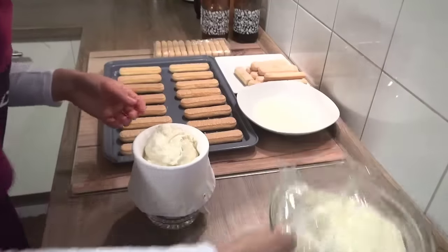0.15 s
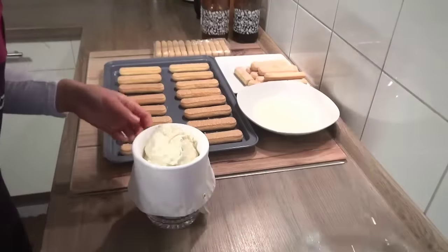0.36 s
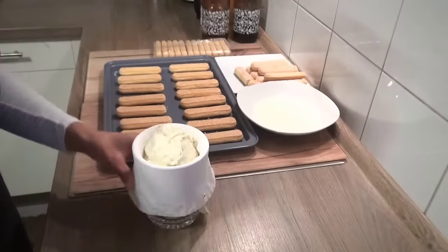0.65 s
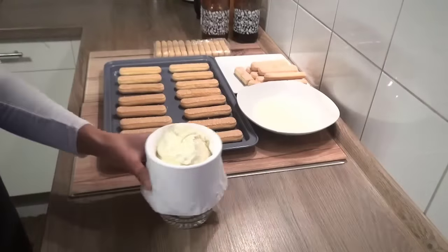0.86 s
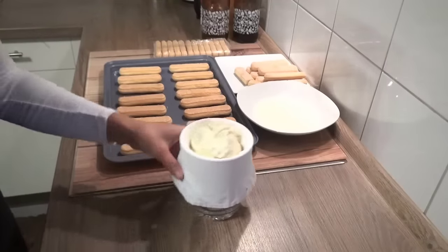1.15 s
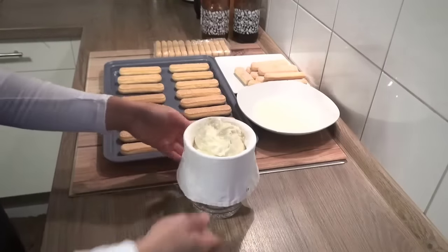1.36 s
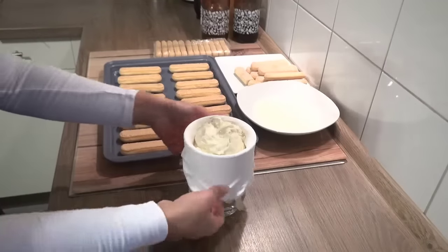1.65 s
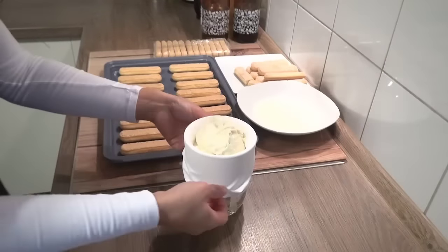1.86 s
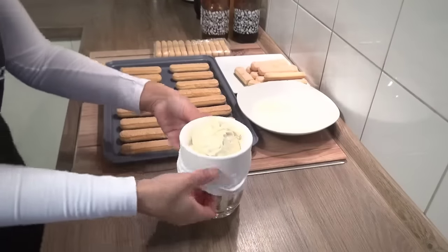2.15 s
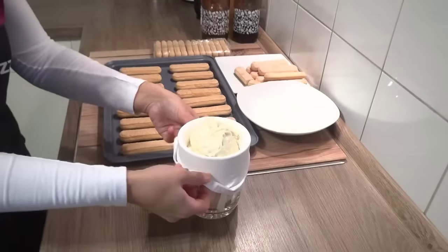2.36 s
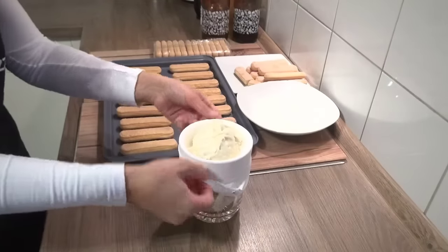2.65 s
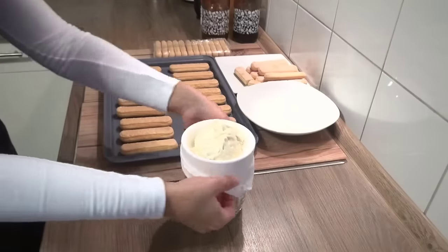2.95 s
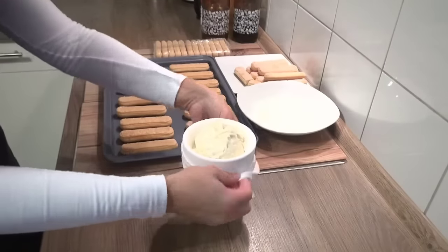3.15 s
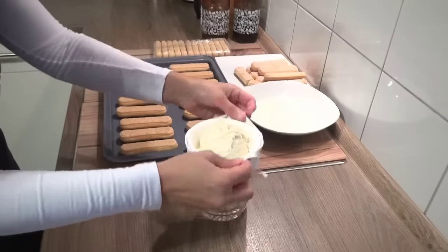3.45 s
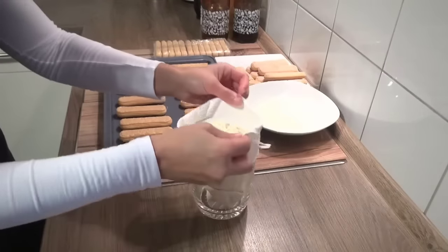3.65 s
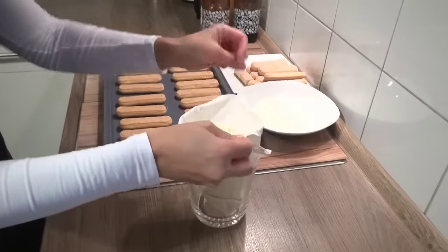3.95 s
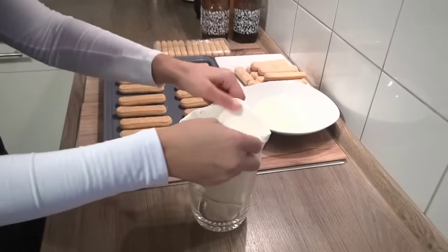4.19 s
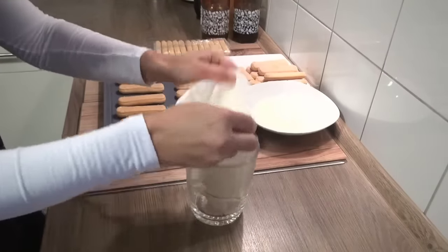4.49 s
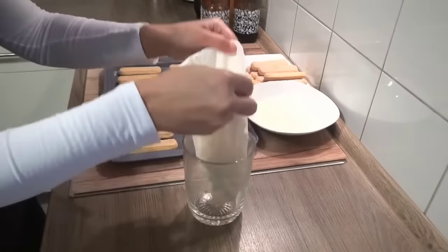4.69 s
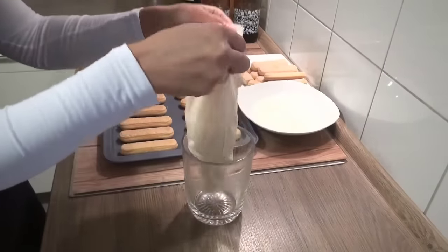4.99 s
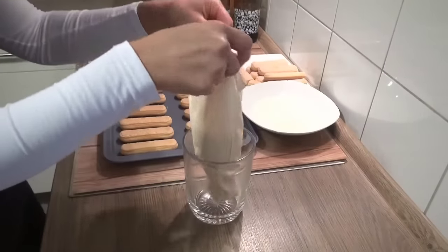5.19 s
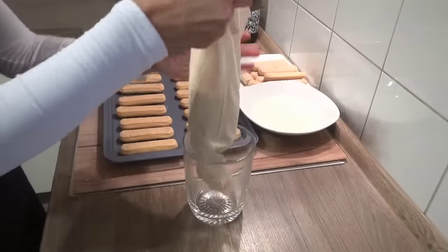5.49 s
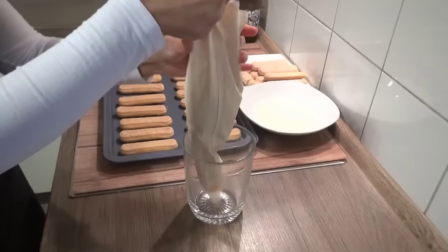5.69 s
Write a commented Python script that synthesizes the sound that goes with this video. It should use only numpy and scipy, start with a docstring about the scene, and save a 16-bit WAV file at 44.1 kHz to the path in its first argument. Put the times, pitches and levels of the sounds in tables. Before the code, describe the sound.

Kitchen handling: bowl thud and rattle, glass scraping on wood, crackling plastic bag, then loud glass knocks and a squeaky rim rub.

```python
"""A kitchen with a wooden worktop, where a plastic piping bag full of cream stands in a tall glass.
A bowl lands with a clink, the glass slides closer, and the bag's cuff is unrolled while the glass rocks.
Then the bag is pulled out: the glass judders, drops back and sings as plastic rubs its rim; a fridge hums.
Impacts and stick-slip jerks excite decaying modes; random clicks and filtered noise make crinkles and rubs;
sines make the singing and the hum, and decaying noise makes the echo of the room."""
import sys
import numpy as np
from scipy import signal
from scipy.fft import rfft, irfft, next_fast_len
from scipy.io import wavfile
from scipy.ndimage import uniform_filter1d

SR = 44100
rng = np.random.default_rng(int(sys.argv[2]) if len(sys.argv) > 2 else 0)


def to_wav(s):
    """Save 16-bit WAV."""
    ch = np.atleast_2d(s).T  # columns
    pcm = np.round(np.clip(ch, -1, 1) * 32767)  # PCM
    wavfile.write(sys.argv[1], SR, pcm.astype(np.int16))


N = 257147
TIME = np.arange(N) / SR   # s

# Levels of single events and movements are given before the gain of their layer.
# Glassware knocks on the worktop: start_s, level_db, hardness_db (tilt towards the upper modes),
# weight_db (tilt towards the deep modes), left_minus_right_db (before the lean of the whole image)
KNOCKS = [(0.752, -5.5, -15, -16, 4.5), (0.779, -11, -14.5, -10, 1), (0.927, -17.5, -13, 1, -3),
          (1.484, -33.5, -8, 2, -1), (1.76, -28, -13.5, -6, 0), (2.703, -20, -16.5, -18, 2.5),
          (3.168, -20, -26, -29, -1), (3.176, -27, -4.5, -4.5, -1), (3.476, -21.5, -14, -11, -0.5),
          (3.506, -29, -7, -9, 0), (3.949, -15.5, -12, 3, 1.5), (3.973, -13.5, -14.5, -11, 4),
          (3.985, -9.5, -6.5, -13.5, -1), (4.393, -25, -15.5, -5, 3), (4.483, -23, -6.5, -5, 4),
          (4.545, -7, -11.5, -12, 3), (4.601, -5.5, -2, -3, -1), (4.626, -14, 8.5, -32, 1),
          (4.661, -8, -18, -14, -1), (4.692, -13.5, -5, -8, -1), (5.1365, -5, -2, -27, 0.5)]
# Glassware slides on the wood: full_speed_s, judder_db, rasp_db, rise_s, hold_s, slowing_db_per_s
SLIDES = [(0.824, -35, -47, .04, .07, 40), (0.949, -29.5, -39.5, 0.087, 0.3, 47),
          (3.963, -31.5, -40, 0.095, 0.087, 30), (4.629, -23.5, -35, 0.3, 0.51, -8)]
JUDDER_FADE_S, RASP_FADE_S = 0.024, 0.066
RASP_FOLLOWS = 0.36   # share of the slowing, in dB, that the rasp follows
CATCH_FADE_S = 0.002   # time constant
# Modes of glass and worktop together: frequency_hz, level_db, t60_s
WORKTOP_MODES = [(90, -12, .35), (140, -11, .22), (174, -10, .22), (222, -5, .25), (248, -5.5, .25),
                 (278, -6, .28), (317, -4, .2), (365, -5, .22), (433, -1, .22), (476, -1.5, .17),
                 (545, -5.5, .18), (642, -3.5, .2), (690, -8, .14), (780, -11, .1), (912, -9, .14),
                 (980, -7.5, .14), (1108, -7.5, .12), (1205, -11, .1), (1302, -12, .1), (1420, -15, .08),
                 (1640, -20, .08), (1820, -19, .08)]
# Spectrum of the base landing or rasping, heard directly: frequency_hz, density_db (per Hz, relative)
GRIT_SPECTRUM = [(100, -31), (300, -4), (650, 1.5), (1300, -3), (2200, -13), (4000, -27.5), (7000, -30),
                 (11000, -48)]
# The bag drags over the rim and the glass sings: full_s, level_db, rise_s, hold_s, fade_s
SINGING = [(4.634, -34, 0.11, 0.021, 0.027), (4.745, -43, 0.081, 0.48, 0.066),
           (5.315, -39, 0.35, 0.11, 0.12)]
GLASS_HZ = 1458   # lowest wall mode
# A spoon rattles in the bowl: start_s, level_db
RATTLE = [(0.764, -28.5), (0.7797, -27), (0.7885, -45)]
# Modes of the spoon: frequency_hz, level_db
SPOON_MODES = [(2756, -4.5), (3617, -5), (4350, -1), (5943, 0.5), (6170, -1), (7450, -9), (8268, -5),
               (9689, -5), (10680, -7)]
# Light touches on the glass: start_s, level_db, favoured_hz
CLINKS = [(1.5055, -65, 7000), (1.5945, -58, 6950), (5.2682, -41.5, 5650)]
# High modes of the glass: frequency_hz, level_db
GLASS_MODES = [(2583, 14), (4048, -29), (5400, 1), (5850, 3), (6933, 3), (7100, 6), (8182, 3)]
GLASS_T60_S, SPOON_T60_S = 0.083, 0.13
# Strokes of the hands on the bag: height_s, crinkle_db, rise_s, fade_s,
# dull_rub_db (relative to crinkle_db), papery_scuff_db (relative to crinkle_db)
STROKES = [(0.678, -63, .12, 0.082, -15, -17), (1.0, -50, 0.41, 0.16, 9.5, -19),
           (1.25, -52.5, 0.087, 0.024, -6, -4), (1.52, -59, 0.085, .1, 6, 2),
           (1.63, -56.5, 0.15, 0.071, -12, -12), (1.76, -46, 0.15, 0.046, -1, -7),
           (2.02, -56.5, 0.66, 0.22, 3.5, -0.5), (2.25, -45.5, 0.24, 0.17, -2, -6.5),
           (2.48, -51.5, .14, 0.17, -3.5, -4.5), (2.63, -50.5, .09, .05, 7, 1.5),
           (2.82, -56.5, 0.39, 0.42, -26, -21), (3.05, -50, 0.18, 0.041, 5, -2),
           (3.17, -47, 0.12, 0.084, -22, -14), (3.28, -46, 0.024, 0.061, -1, -7),
           (3.385, -46.5, 0.041, 0.049, 5.5, -2.5), (3.59, -47, 0.17, 0.06, 3, 3.5),
           (3.74, -61.5, 0.45, .06, 10, 10.5), (3.9, -52, 0.19, 0.028, 3, 6),
           (4.272, -53, 0.18, 0.015, -1, 6), (4.36, -55, 0.098, 0.021, 6, 9.5),
           (4.61, -51, 0.25, 0.036, -9, -12), (5.278, -53, 0.15, 0.053, 17, 17),
           (5.53, -53, 0.22, 0.19, -3, 0.5), (5.709, -44, .15, 0.09, -25, -1)]
# Spectrum of the plastic film: frequency_hz, density_db (per Hz, relative)
PLASTIC_SPECTRUM = [(700, -20.5), (1400, -4.5), (2200, -7), (3000, -2), (4200, -2.5), (6000, -3.5),
                    (9000, -7), (11000, -11)]
# Spectrum of the dull rub: frequency_hz, density_db (per Hz, relative)
RUB_SPECTRUM = [(100, -42), (160, -7.5), (250, 4.5), (400, -7), (600, 1), (800, -19.5), (1500, -27),
                (3000, -70)]
# Spectrum of the papery scuff: frequency_hz, density_db (per Hz, relative)
SCUFF_SPECTRUM = [(500, -19.5), (800, 7.5), (1080, 16.5), (1300, 9.5), (1900, 2.5), (3000, -6.5),
                  (8000, -39)]
# Larger creases snap through: start_s, level_db, pitch_hz
SNAPS = [(1.664, -30.5, 5500), (2.016, -43, 4830), (2.118, -40.5, 4800), (2.2008, -26, 2900),
         (2.227, -29, 3650), (2.245, -30, 4130), (2.259, -31.5, 4500), (2.4752, -28.5, 4130),
         (2.495, -33.5, 4570), (2.539, -30.5, 3860), (2.629, -25.5, 3750), (3.157, -27, 2600),
         (3.377, -33.5, 5950), (3.817, -38.5, 1670), (3.891, -31, 1880), (3.948, -31, 4670),
         (4.315, -34, 1140), (4.453, -38, 1200), (4.545, -22.5, 1840), (4.601, -21, 1830),
         (5.098, -26.5, 2160), (5.136, -21, 4570), (5.266, -24, 6150), (5.5233, -37, 3480),
         (5.63, -32, 1210), (5.776, -32.5, 1160)]
SNAP_FADE_S = 0.004   # time constant
# Partials of the fridge motor: frequency_hz, level_db
HUM = [(48.4, -51), (96.9, -54.5), (145.3, -64.5)]
# Spectrum of the quiet air: frequency_hz, density_db (per Hz, relative)
AIR_SPECTRUM = [(94, -3), (160, -16), (194, -15), (361, -6.5), (395, -13.5), (524, -14), (815, -10.5),
                (956, -12.5), (9050, -30), (10100, -22.5), (11000, -32.5), (14300, -99), (22000, -120)]
AIR_DB = -59
# Decay of the room: frequency_hz, t60_s
ROOM_DECAY = [(100, 0.28), (500, .4), (2000, 0.25), (10000, 0.33)]
# Filter on the echo that widens the image: frequency_hz, side_level_db
WIDTH = [(50, -19), (120, -17), (500, -17), (1000, -15.5), (3000, -11.5), (8000, -9), (11000, -8)]
# Lean of the whole stereo image: frequency_hz, left_minus_right_db
LEAN = [(50, .7), (85, 1.2), (130, 4.3), (260, .3), (520, -.6), (1100, -2.7), (2500, -1.6), (10000, -.8)]
CUTOFF_HZ = 11050


def from_db(db):
    """Level law: twenty decibels are a factor of ten in amplitude."""
    return 10 ** (np.asarray(db) / 20)


def rms_one(x):
    """Normalisation to unit mean power."""
    return x / np.sqrt(np.mean(x ** 2) + 1e-20)


def evened(x, size):
    """Short-term power normalisation: the rms stays near 1 over stretches of size samples."""
    local_power = np.maximum(uniform_filter1d(x ** 2, size), 0)
    return x / np.sqrt(local_power + 1e-3 * np.mean(x ** 2))


def at_hz(points, hz):
    """Interpolation of a two-column curve along a logarithmic frequency axis."""
    point_hz, values = np.array(points)[:, 0], np.array(points)[:, 1]
    return np.interp(np.log(np.maximum(hz, 1)), np.log(point_hz), values)


def add(track, s, sound):
    """Superposition: a sound is summed into a track from time s."""
    start = int(round(s * SR))
    track[start:start + len(sound)] += sound[:N - start]


def highpass(x, hz):
    """Second-order attenuation of everything below hz."""
    return signal.sosfilt(signal.butter(2, hz, "high", fs=SR, output="sos"), x)


def bandpass(x, order, low_hz, high_hz):
    """Band limitation between two corner frequencies."""
    return signal.sosfilt(signal.butter(order, [low_hz, high_hz], "band", fs=SR, output="sos"), x)


def coloured(x, spectrum):
    """Minimum-phase filtering: folding the cepstrum makes the given spectrum causal."""
    size = next_fast_len(N + 8192)
    level_db = at_hz(spectrum, np.fft.rfftfreq(size, 1 / SR))
    cepstrum = irfft(np.log(from_db(level_db)), size)
    cepstrum[1:size // 2] *= 2
    cepstrum[size // 2 + 1:] = 0
    return irfft(rfft(x, size) * np.exp(rfft(cepstrum)), size)[:N]


def ring(clicks, hz, t60):
    """Damped resonance: a unit click sets off a decaying sine of initial height 1."""
    radius = from_db(-60 / (t60 * SR))
    angle = 2 * np.pi * hz / SR
    return signal.lfilter([0, np.sin(angle)], [1, -2 * radius * np.cos(angle), radius ** 2], clicks + 1e-18)


def grains(per_s, spread_db):
    """Random point process: clicks of either sign, mostly small, a few large."""
    size_db = spread_db * np.minimum(rng.exponential(1, N), 4)
    sizes = from_db(size_db) * rng.choice([-1, 1], N)
    return sizes * (rng.random(N) < per_s / SR)


def swell(s, rise_s, hold_s, fade_s):
    """Motion envelope: a quadratic rise up to time s, a hold, then exponential decay."""
    rising = np.clip(1 + (TIME - s) / rise_s, 0, 1) ** 2
    return rising * np.exp(-np.maximum(TIME - s - hold_s, 0) / fade_s)


def mode_gain(hz, level_db, hardness_db, usual_db=-4.5, knee_hz=750):
    """Contact stiffness: hard contacts feed the upper modes, soft ones only the lower."""
    upper = 1 / (1 + (knee_hz / hz) ** 4)
    return from_db(level_db + (hardness_db - usual_db) * upper)


def knocks(gain_db=-3.0, scatter_db=0.5, crack_db=-12.5, crack_fade_s=0.027, push=0.7, push_hz=520,
           usual_weight_db=-11.5, deep_hz=300, free_share=0.063, settle_s=0.012, rise_s=0.00061):
    """Impact excitation: a short push and a gritty crack set the modes ringing; returns mid and side."""
    out, t = np.zeros((2, N)), TIME[:SR // 2]
    hz, level_db, t60 = np.transpose(WORKTOP_MODES)[:, :, None]
    deep = 1 / (1 + (hz / deep_hz) ** 4)
    signs = (-1) ** np.arange(len(hz))[:, None]
    grit = rms_one(coloured(rng.standard_normal(N), GRIT_SPECTRUM))
    modes = np.sin(2 * np.pi * hz * t) * np.exp(-np.log(1000) * t / t60)
    for k, (s, knock_db, hardness_db, weight_db, pan_db) in enumerate(KNOCKS):
        weighted_db = level_db + (weight_db - usual_weight_db) * deep
        scattered_db = weighted_db + scatter_db * rng.standard_normal(hz.shape)
        strength = mode_gain(hz, scattered_db, hardness_db)
        blow = np.sum(rng.permutation(signs) * strength * modes, axis=0)
        # most of the motion dies while the base settles; the rest rings freely
        blow *= free_share + (1 - free_share) * np.exp(-t / settle_s)
        # soft landings swell in
        blow *= 1 - np.exp(-t / (rise_s * from_db(-hardness_db / 2)))
        blow /= np.sqrt(uniform_filter1d(blow ** 2, size=220).max())
        # a harder contact is a shorter push
        turn = np.pi * push_hz * from_db((hardness_db + 10) / 4) * t - 2.5
        pulse = push * 2 * (2 * turn ** 2 - 1) * np.exp(-turn ** 2)
        crack = np.roll(grit, k * len(t))[:len(t)] * np.exp(-t / crack_fade_s)
        crack *= mode_gain(GLASS_HZ, crack_db, hardness_db)
        sound = from_db(knock_db + gain_db) * (blow + pulse + crack)
        left_over_right = from_db(pan_db)
        add(out[0], s, sound)
        add(out[1], s, sound * (left_over_right - 1) / (left_over_right + 1))
    return highpass(out, 105)


def slides(gain_db=1.0, softer_db=2.5, catch_db=-17.5, catches_per_s=55, catch_hz=2200, lowest_hz=115):
    """Stick-slip friction: uneven jerks shake the modes while fine grit rasps, with sharper catches."""
    slips = evened(grains(per_s=240, spread_db=4.0), size=2400)
    grit = evened(coloured(grains(per_s=5000, spread_db=4.0), GRIT_SPECTRUM), size=2400)
    catch_sizes = abs(grains(catches_per_s, spread_db=2.0))
    catches = signal.lfilter([1], [1, -np.exp(-1 / (CATCH_FADE_S * SR))], catch_sizes)
    crackle = coloured(catches * rng.standard_normal(N), PLASTIC_SPECTRUM)
    crackle = rms_one(signal.sosfilt(signal.butter(1, catch_hz, fs=SR, output="sos"), crackle))
    force, rasp = 1e-9, 1e-9   # keeps their ratio finite at rest
    for s, judder_db, rasp_db, rise_s, hold_s, slowing_db_per_s in SLIDES:
        lost_db = slowing_db_per_s * np.clip(TIME - s, 0, hold_s)
        force = force + from_db(judder_db - lost_db) * swell(s, rise_s, hold_s, JUDDER_FADE_S)
        rasp_level = from_db(rasp_db - RASP_FOLLOWS * lost_db)
        rasp = rasp + rasp_level * swell(s, rise_s, hold_s, RASP_FADE_S)
    hardness_db = np.minimum(20 * np.log10(rasp / force) - softer_db, 0)
    body, body_power = 0, 0
    for k, (hz, level_db, t60) in enumerate(WORKTOP_MODES):
        shaken = slips * force * mode_gain(hz, level_db, hardness_db)
        body = body + (-1) ** k * ring(shaken, hz, t60)
        body_power += from_db(level_db) ** 2 * t60 * SR / (4 * np.log(1000))
    judder = from_db(gain_db) * highpass(body, lowest_hz) / np.sqrt(body_power)
    return judder + rasp * (grit + from_db(catch_db) * crackle)


def singing_glass(gain_db=1.5, waver=0.19, waver_t60_s=0.22):
    """Friction-driven resonance: rubbing keeps the lowest wall mode going, a little unevenly."""
    drive = sum(from_db(level_db) * swell(s, rise_s, hold_s, fade_s)
                for s, level_db, rise_s, hold_s, fade_s in SINGING)
    steady = np.sqrt(2) * np.sin(2 * np.pi * GLASS_HZ * TIME)
    uneven = rms_one(ring(rng.standard_normal(N), GLASS_HZ, waver_t60_s))
    return from_db(gain_db) * drive * (steady + waver * uneven)


def chime(modes, favour_db, t60, tick, tick_fade_s, blur_t60):
    """Modal ringing after a hard touch: a noise tick, then modes blurred by the chattering contact."""
    t = TIME[:SR // 3]
    hz, level_db = np.transpose(modes)
    chatter = rng.standard_normal((len(hz), len(t)))
    strength = from_db(level_db + favour_db)
    rings = sum(gain * rms_one(ring(noise, f, blur_t60)) for f, gain, noise in zip(hz, strength, chatter))
    ringing = rings / np.linalg.norm(strength) * np.exp(-np.log(1000) * t / t60)
    return ringing + tick * rng.standard_normal(len(t)) * np.exp(-t / tick_fade_s)


def clinks(spoon_db=-9.0, glass_db=12.0):
    """Selective mode excitation: the spoon rattles; each glass touch favours modes near its pitch."""
    out, glass_hz = np.zeros(N), np.array(GLASS_MODES)[:, 0]
    for s, level_db in RATTLE:
        sound = chime(SPOON_MODES, 0, SPOON_T60_S, tick=.7, tick_fade_s=.005, blur_t60=.035)
        add(out, s, from_db(level_db + spoon_db) * sound)
    for s, level_db, favoured_hz in CLINKS:
        favour_db = -16 * np.abs(np.log2(glass_hz / favoured_hz))   # 16 dB less per octave away
        sound = chime(GLASS_MODES, favour_db, GLASS_T60_S, tick=.45, tick_fade_s=.004, blur_t60=.025)
        add(out, s, from_db(level_db + glass_db) * sound)
    return out


def handling():
    """Power addition: overlapping strokes sum in power to give crinkle, dull rub and scuff strength."""
    power = 0
    for s, crinkle_db, rise_s, fade_s, dull_db, scuff_db in STROKES:
        levels = from_db(crinkle_db + np.array([0, dull_db, scuff_db]))
        power = power + np.outer(levels, swell(s, rise_s, 0, fade_s)) ** 2
    return np.sqrt(power)


def bag(effort, crinkle_db=-4.5, swish_db=0.5, creases_per_s=600):
    """Buckling of thin film: tiny creases each ring a few cycles over the swish of film on film."""
    pitches = np.geomspace(1400, 10500, 14)   # Hz
    creases = grains(creases_per_s, spread_db=4.5)
    dealt = rng.integers(0, len(pitches), N)   # which pitch each crease gets
    crinkle = sum(np.sqrt(hz) * ring(creases * (dealt == k), hz, 5 / hz) for k, hz in enumerate(pitches))
    crinkle = evened(coloured(crinkle, PLASTIC_SPECTRUM), size=3000)
    swish = rms_one(coloured(rng.standard_normal(N), PLASTIC_SPECTRUM))
    return effort * (from_db(crinkle_db) * crinkle + from_db(swish_db) * swish)


def rubbing(dull, papery):
    """Sliding friction: cream-filled film drags over glass in a dull, fine rub with a papery scuff."""
    catches = grains(per_s=1500, spread_db=3.0)
    rub = evened(coloured(catches, RUB_SPECTRUM), size=3000)
    scuff = evened(coloured(catches, SCUFF_SPECTRUM), size=3000)
    return dull * rub + papery * scuff


def snaps(gain_db=-4.5, cycles=38.0, broad=2.23, flap=1.0, flap_hz=1300, flap_t60_s=0.0036, small_hz=2600):
    """Snap-through instability: a fold flips, rings in its patch of film and flaps the sheet around."""
    out, t = np.zeros(N), TIME[:SR // 16]
    for s, level_db, hz in SNAPS:
        burst = rng.standard_normal(len(t)) * np.exp(-t / SNAP_FADE_S)
        wide = bandpass(burst, 1, hz / 2, 2 * hz)
        # each fold has a few more resonances of its own
        fold_hz = np.minimum(hz * 2 ** rng.uniform(-.8, 1.3, 3), 10500)
        folds = sum(rms_one(ring(wide, f, 14 / f)) for f in fold_hz)
        # small, high folds hardly move the sheet
        flapping = flap * min(1, small_hz / hz) ** 2 * rms_one(ring(wide, flap_hz, flap_t60_s))
        patch = rms_one(ring(wide, hz, cycles / hz))
        snap = patch + folds / 2 + broad * rms_one(wide) + flapping
        snap /= np.sqrt(uniform_filter1d(snap ** 2, size=90).max())
        add(out, s, from_db(level_db + gain_db) * snap)
    return out


def fridge():
    """Periodic excitation: steady sines at the motor's turning rate and its multiples."""
    return sum(np.sqrt(2) * from_db(level_db) * np.sin(2 * np.pi * (hz * TIME + rng.random()))
               for hz, level_db in HUM)


def background(rumble_db=-66.0):
    """Stationary noise: the quiet air of the room over a low rumble."""
    rumble = rms_one(bandpass(rng.standard_normal(N), 2, 35, 200))
    air = rms_one(coloured(rng.standard_normal(N), AIR_SPECTRUM))
    return from_db(rumble_db) * rumble + from_db(AIR_DB) * air


def kitchen(x, first_s=0.0081):
    """Diffuse reverberation: the echo of a small tiled room, noise dying octave by octave."""
    t, tail = TIME[:SR // 2], 0
    for low_hz in 80 * 2. ** np.arange(8):
        band = bandpass(rng.standard_normal(len(t)), 2, low_hz, min(2 * low_hz, SR / 2 - 1))
        t60 = at_hz(ROOM_DECAY, low_hz * np.sqrt(2))
        tail = tail + band * np.exp(-np.log(1000) * t / t60)
    tail = tail * (t > first_s)
    return signal.fftconvolve(x, tail / np.linalg.norm(tail))[:N]


def scene(wood_wet_db=-4.5, plastic_wet_db=-10.0):
    """Mid-side superposition: direct sound in the middle, knock panning and echo at the sides."""
    effort, dull, papery = handling()
    knock, knock_side = knocks()
    wood = knock + slides()
    plastic = bag(effort) + rubbing(dull, papery) + snaps() + clinks()   # and the clinks
    air = background()
    echo = kitchen(from_db(wood_wet_db) * wood + from_db(plastic_wet_db) * plastic)
    mid = wood + plastic + air + echo + fridge() + singing_glass()
    side = knock_side + coloured(kitchen(wood + plastic + air), WIDTH)
    channels = []
    for sign in (1, -1):   # left, right
        half_lean = [(hz, sign * lean_db / 2) for hz, lean_db in LEAN]
        channels.append(coloured(mid + sign * side, half_lean))
    return np.array(channels)


def record(dry):
    """Saturation and band limitation: the loudest peaks are rounded and the top is cut."""
    rounded = .9 * np.tanh(dry / .9)
    return signal.sosfilt(signal.ellip(10, .2, 80, CUTOFF_HZ, fs=SR, output="sos"), rounded)


dry = scene()
out = record(dry)
to_wav(out)
```